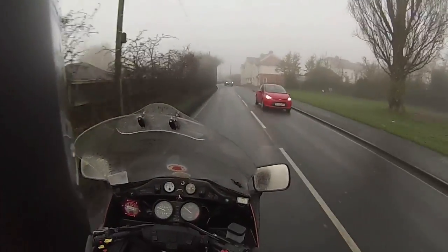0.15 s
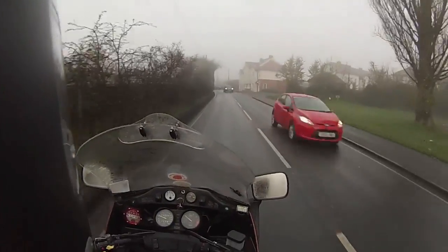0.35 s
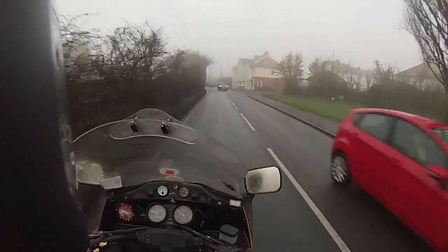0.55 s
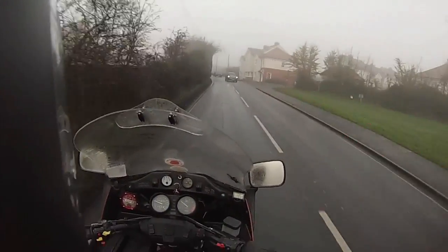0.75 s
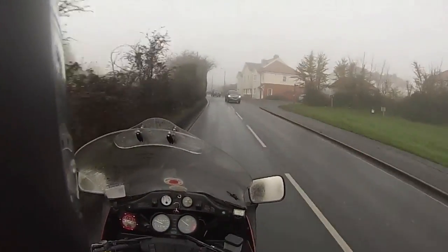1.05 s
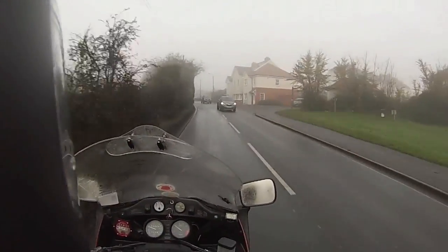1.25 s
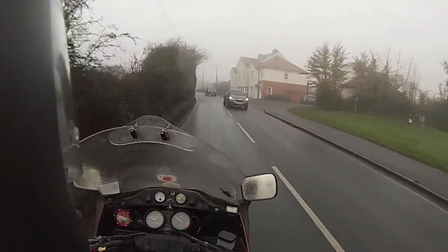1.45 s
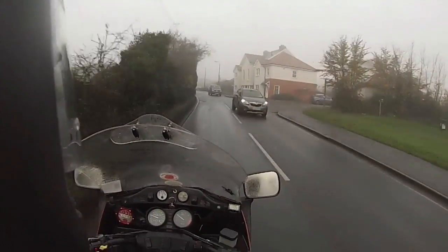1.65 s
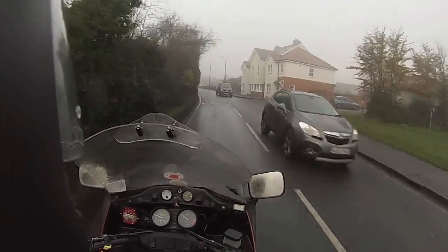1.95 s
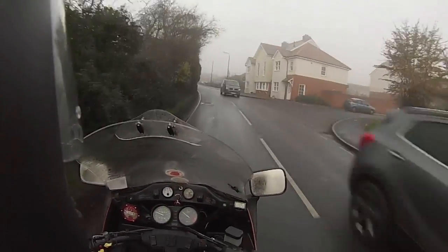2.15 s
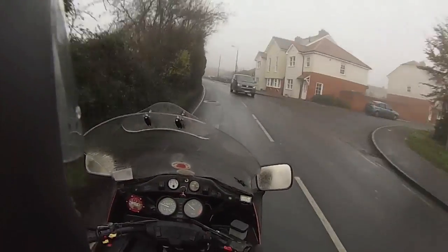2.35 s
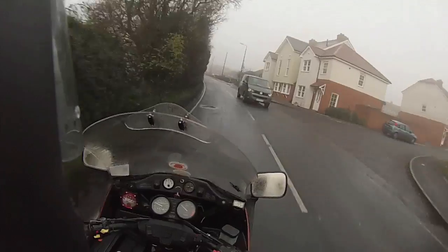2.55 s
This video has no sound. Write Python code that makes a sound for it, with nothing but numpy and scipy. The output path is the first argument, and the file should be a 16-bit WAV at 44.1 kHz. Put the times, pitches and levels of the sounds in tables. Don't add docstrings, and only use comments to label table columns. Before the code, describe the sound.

Motorcycle engine droning on a wet road, wind buffeting, grit cracks and cars hissing past

```python
import sys
import numpy as np
from scipy import signal
from scipy.fft import rfft, irfft, next_fast_len
from scipy.io import wavfile
from scipy.ndimage import uniform_filter1d, map_coordinates

SR = 44100
rng = np.random.default_rng(int(sys.argv[2]) if len(sys.argv) > 2 else 0)


def ratio(d):
    e = np.asarray(d, float) / 20
    return 10 ** e


def pcm_store(signal):
    levels = np.round(np.clip(np.atleast_2d(signal), -1, 1) * 32767)
    wavfile.write(sys.argv[1], SR, levels.astype(np.int16).T)


N = 119070


def unit(x):
    return x / np.sqrt(np.mean(x ** 2) + 1e-20)


def along(points, hz):
    f, v = np.transpose(points)
    return np.interp(np.log(hz + 1), np.log(f + 1), v)


def curves(rows):
    s, *cols = np.transpose(rows)
    return [np.interp(np.arange(N) / SR, s, c) for c in cols]


def wobble(knots_per_s):
    return map_coordinates(rng.standard_normal(N // 100), [np.arange(N) * knots_per_s / SR])


def filtered(x, response):
    m = next_fast_len(N + 8192)
    return irfft(rfft(x, m) * response(np.fft.rfftfreq(m, 1 / SR)), m)[..., :N]


def rush(spectrum, patchy_db, gate=1):
    z = signal.stft(gate * rng.standard_normal(N), nperseg=512)[2]
    field = uniform_filter1d(rng.standard_normal(z.shape), size=5, axis=0)
    field = uniform_filter1d(field, size=8, axis=1)
    x = signal.istft(z * ratio(patchy_db * unit(field)), nperseg=512)[1][:N]
    return unit(filtered(x, lambda hz: ratio(along(spectrum, hz))))


# frequency in Hz, level in dB.
SIDE_HUM_SPECTRUM = [(20, -4), (60, 10.5), (200, -19), (500, -26.5), (2000, -35), (8000, -49), (15000, -41)]


def channel_difference():
    return ratio(-52) * rush(SIDE_HUM_SPECTRUM, patchy_db=0.5)


# frequency in Hz, level in dB.
FINE_SPRAY_SPECTRUM = [(5000, -37), (8300, -21), (10000, -4), (12000, -1), (15500, 1)]
# time in seconds, level in dB.
FINE_SPRAY_LEVEL = [
    (0, -50),
    (.5, -66),
    (1.2, -63),
    (2.1, -60),
    (2.35, -48),
    (2.7, -54),
]


def fine_spray():
    level_db, = curves(FINE_SPRAY_LEVEL)
    return ratio(level_db) * rush(FINE_SPRAY_SPECTRUM, patchy_db=-2.0)


# frequency in Hz, level in dB.
SEAM_SPECTRUM = [(1500, -29), (2800, 5), (3600, 3.5), (4500, -1.5), (6500, -7), (8000, -52), (12000, -41)]
# time in seconds, level in dB.
SEAM_LEVEL = [(0, -40.5), (.1, -39.5), (.2, -43.5), (.35, -40), (.45, -40), (.55, -45.5), (.6, -48.5),
              (.68, -53), (.8, -59), (2.7, -51)]


def seam_hiss():
    level_db, = curves(SEAM_LEVEL)
    return ratio(level_db) * rush(SEAM_SPECTRUM, patchy_db=2.0)


# time in seconds, level in dB.
WIND_LEVEL = [(0, -24.5), (.13, -22), (.3, -23), (.46, -18.5), (.56, -21.5), (.66, -22), (.8, -31),
              (1.0, -30), (1.25, -29.5), (1.35, -24.5), (1.6, -34.5), (1.85, -41), (2.0, -25.5),
              (2.13, -36), (2.32, -28), (2.45, -30.5), (2.58, -25), (2.7, -36)]
# frequency in Hz, level in dB.
BUFFET_SPECTRUM = [(20, -2.5), (50, -9.5), (100, -6.5), (250, -5.5), (420, -5), (600, -21), (1500, -22.5),
                   (4000, -74)]


def wind_buffet():
    level_db, = curves(WIND_LEVEL)
    gust = ratio(0.6 * wobble(14) + 2.4 * wobble(45.53))
    return ratio(level_db) * unit(gust * rush(BUFFET_SPECTRUM, patchy_db=0.4))


# frequency in Hz, level in dB.
OWN_TYRE_SPECTRUM = [(60, -14), (300, -13), (800, -2), (2000, -10.5), (3500, -33), (6000, -18.5),
                     (10000, -37), (16000, -60)]


def own_tyres(flutter_db):
    return ratio(-41.5 + flutter_db) * rush(OWN_TYRE_SPECTRUM, patchy_db=1.5)


# time in seconds, tyre roar in dB, tread song in dB, spray in dB.
TRAFFIC_LEVELS = [(0, -31, -36, -43.5), (.15, -40, -36, -46), (.4, -31, -30.5, -42.5),
                  (.55, -31.5, -28, -39), (.6, -28.5, -31, -42), (.68, -31.5, -34.5, -57),
                  (.8, -58, -45, -56), (1.25, -43, -37, -45.5), (1.37, -26, -55, -41),
                  (1.7, -28, -36.5, -39.5), (1.9, -24.5, -33.5, -39), (2.02, -25, -26.5, -41),
                  (2.15, -25.5, -31, -39.5), (2.3, -27.5, -36.5, -40), (2.5, -30.5, -39, -46.5),
                  (2.7, -29, -38, -48)]
# frequency in Hz, level in dB.
ROAR_SPECTRUM = [(200, -79), (400, -6), (600, 1), (1000, -7), (1300, -15.5), (2000, -16.5), (3000, -25),
                 (6000, -73)]
# frequency in Hz, level in dB.
TREAD_SPECTRUM = [(500, -43), (800, -4.5), (1000, 1), (1180, 0.5), (1350, -9), (2000, -41)]
# frequency in Hz, level in dB.
SPRAY_SPECTRUM = [(500, -38), (1500, 2), (3000, 9.5), (5000, 4), (7000, -3.5), (10000, -14.5), (13000, -11),
                  (16000, -24)]


def oncoming_cars(flutter_db):
    roar_db, tread_db, spray_db = curves(TRAFFIC_LEVELS)
    roar = ratio(roar_db) * rush(ROAR_SPECTRUM, patchy_db=0.8)
    tread = ratio(tread_db) * rush(TREAD_SPECTRUM, patchy_db=0.8)
    spray = ratio(spray_db + 0.41 * wobble(60)) * rush(SPRAY_SPECTRUM, patchy_db=2.0)
    return ratio(flutter_db) * (roar + tread) + spray


# start in seconds, crack in dB, snap over crack in dB, length in seconds, ring in Hz.
GRIT_HITS = [(0.1165, -5, -10, .0002, 1500), (.118, -5.5, -11, 0.00071, 1680),
             (0.1193, -10, -9, .0004, 2400), (0.1219, -13.5, -29, 0.00043, 1550),
             (.1271, -14.5, -28, 0.0043, 2100), (.571, 2, -20, 0.00025, 1170),
             (0.5721, 3, -22, 0.00027, 1260), (.5728, -5, -8, 0.0026, 2040),
             (0.5747, -13, -24, .0005, 2250), (0.7066, -8.5, -5, 0.0024, 1750),
             (.7091, -3, -3, 0.00056, 1680), (.7098, 3, -11, 0.00054, 1565),
             (0.7109, 5, -3.5, 0.00042, 1560), (0.7119, 6.5, -2, 0.00052, 2276),
             (1.704, -32, -5, 0.0011, 1500), (1.883, -17, -10, 0.0028, 1300), (2.02, -27, -3, 0.0031, 2190),
             (2.3233, -20, -3, .0004, 1300), (2.3252, -20, 2, 0.00033, 1480),
             (2.3275, -13.5, -6, .0003, 2400), (2.333, -25, -16, .0003, 1400),
             (2.372, -21.5, -25, 0.0031, 2250), (2.47, -43, 13, .002, 4050)]


def grit():
    rattle_t60_s, ring_t60_s = 0.002, 0.0032
    after_db, after_t60_s = -22, 0.03
    snap_hz = 3800
    out, t = np.zeros(N + SR), np.arange(SR // 8) / SR
    shell_swell = np.sqrt(t) * ratio(-60 * t / ring_t60_s)
    snap_kernel = unit(t[:16] * np.exp(-2 * np.pi * snap_hz * t[:16])) / 8
    for start_s, crack_db, snap_db, length_s, ring_hz in GRIT_HITS:
        noise = rng.standard_normal((2, len(t)))
        noise[:, 0] = 9, 3.5
        past_s = np.maximum(t - length_s, 0)
        burst = ratio(-60 * past_s / rattle_t60_s)
        shake = noise[0] * (burst + ratio(after_db - 60 * past_s / after_t60_s))
        snap = np.convolve(noise[1] * burst, snap_kernel)[:len(t)]
        ring = signal.fftconvolve(shake, shell_swell * np.sin(2 * np.pi * ring_hz * t))[:len(t)]
        hit = ring / np.abs(ring).max() + ratio(snap_db) * snap
        out[round(start_s * SR):][:len(t)] += ratio(crack_db) * hit
    return out[:N]


# start in seconds, level in dB, frequency in Hz, T60 in seconds.
MOUNT_JOLTS = [(0.13, -17, 180, .03), (0.2, -15, 200, .04), (0.15, -10, 270, 0.025), (.5709, 9, 314, 0.018),
               (.7105, -3, 430, .014), (.7102, -7.5, 790, 0.0077), (.1164, -16, 4500, 0.011),
               (.1166, -27, 7350, .012), (.5711, -19, 5300, .012), (0.57, -24, 5200, 0.015),
               (.711, -10, 4900, 0.0065), (2, -35, 4800, 0.0068), (.566, -6, 85, .06), (2.316, -16, 83, .1)]


def jolts():
    out, t = np.zeros(N + SR), np.arange(SR // 8) / SR
    for start_s, level_db, hz, t60_s in MOUNT_JOLTS:
        swing = ratio(level_db - 60 * t / t60_s) * np.sin(2 * np.pi * hz * t)
        out[round(start_s * SR):][:len(t)] += swing
    return out[:N]


ENGINE_ORDERS = [1, 2, 3, 4, 5, 6, 7, 8, 10, 12.5, 18]
ENGINE_ORDER_LEVELS = [-45, -30, -33, -38, -44.5, -40, -42.5, -60, -57, -40.5, -50]
# frequency in Hz, level in dB.
EXHAUST_SPECTRUM = [(60, -120), (90, -10), (250, 0), (500, -4), (1200, -14), (3000, -28), (6000, -50),
                    (15000, -90)]


def engine():
    cycle_hz, gate_power = 39.4, 4.4
    phase = 2 * np.pi * np.cumsum(cycle_hz * (1 + 0.0041 * wobble(6.7))) / SR
    tones = np.zeros(N)
    for order, level_db in zip(ENGINE_ORDERS, ENGINE_ORDER_LEVELS):
        level = np.sqrt(2) * ratio(level_db + 1.2 * wobble(7))
        tones += level * np.sin(order * phase + rng.uniform(0, 2 * np.pi))
    strong_puff = (0.5 + 0.5 * np.cos(phase)) ** gate_power
    weak_puff = 0.84 * (0.5 - 0.5 * np.cos(phase)) ** gate_power
    gate = (strong_puff + weak_puff) * ratio(3.1 * wobble(39))
    return tones + ratio(-33) * rush(EXHAUST_SPECTRUM, patchy_db=-0.15, gate=gate)


# centre in Hz, width in Hz, gain in dB.
SHELL_MODES = [(1747, 35, 5.5), (2420, 856, 10.5), (3860, 2170, -10.5), (4870, 250, 9), (7200, 790, 2.5),
               (8400, 140, 7.5), (10160, 2040, 10)]


def housing(hz):
    return ratio(sum(db / (1 + (2 * (hz - c) / w) ** 2) for c, w, db in SHELL_MODES))


def microphone(hz):
    low_cut_hz, roll_hz, top_hz = 59.5, 11900, 15350
    low = 1j * hz / low_cut_hz
    bass_cut = (low / (1 + low)) ** 2
    return bass_cut / (1 + (hz / roll_hz) ** 4.6) / (1 + (hz / top_hz) ** 60)


def scene():
    buffet = wind_buffet()
    hiss = seam_hiss()
    drone = engine()
    flutter_db = 0.7 * wobble(35.53)
    road = own_tyres(flutter_db) + oncoming_cars(flutter_db)
    mid = filtered(drone + buffet + road, housing) + hiss + grit() + jolts()
    side = channel_difference()
    mid = mid + fine_spray()
    return np.array([mid + side, mid - side])


def top_cut(x):
    return signal.sosfilt(signal.butter(12, 15610, fs=SR, output="sos"), x)


# start in seconds, slow dip in dB, quick dip in dB.
GAIN_DUCKS = [
    (0.552, 7, 2),
    (0.577, 6, 2),
    (0.718, 15.5, 29),
]


def record(dry):
    recover_db_per_s, attack_s = 13.5, 0.0074
    quick_hold_s, quick_s = 0.018, 0.018
    ceiling = 0.97
    t, slow, quick = np.arange(N) / SR, np.zeros(N), np.zeros(N)
    for start_s, slow_db, quick_db in GAIN_DUCKS:
        since_s = np.maximum(t - start_s, 0)
        onset = 1 - np.exp(-since_s / attack_s)
        slow = np.maximum(slow, onset * (slow_db - recover_db_per_s * since_s))
        quick += onset * quick_db * np.exp(-np.maximum(since_s - quick_hold_s, 0) / quick_s)
    mix = filtered(dry, microphone) * ratio(-slow - quick)
    return top_cut(np.clip(mix, -ceiling, ceiling))


dry = scene()
out = record(dry)
pcm_store(out)
```